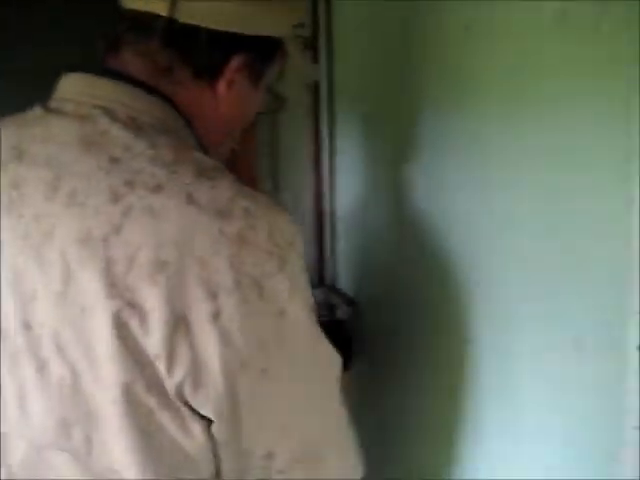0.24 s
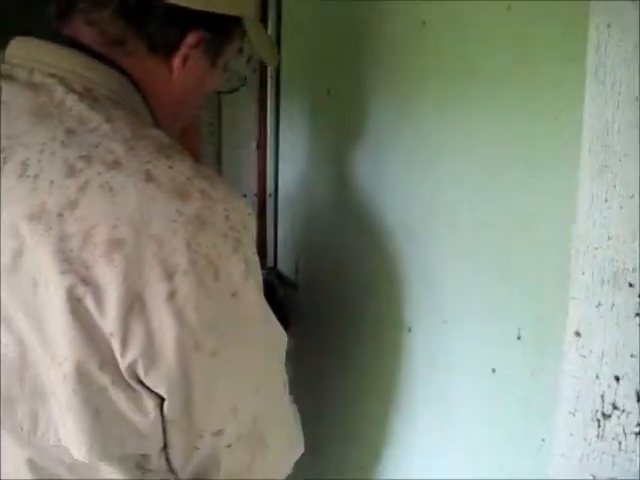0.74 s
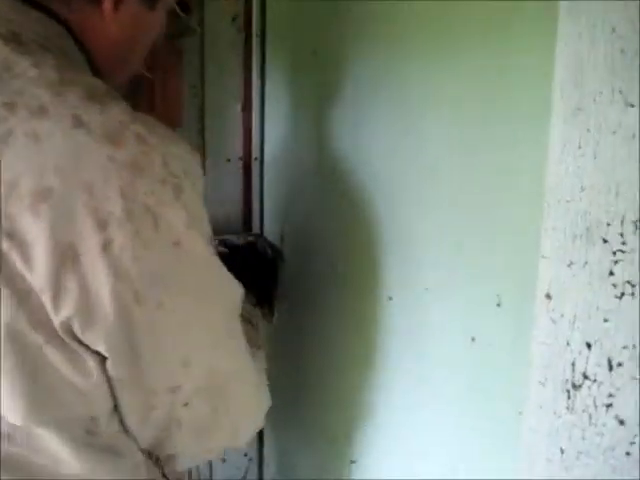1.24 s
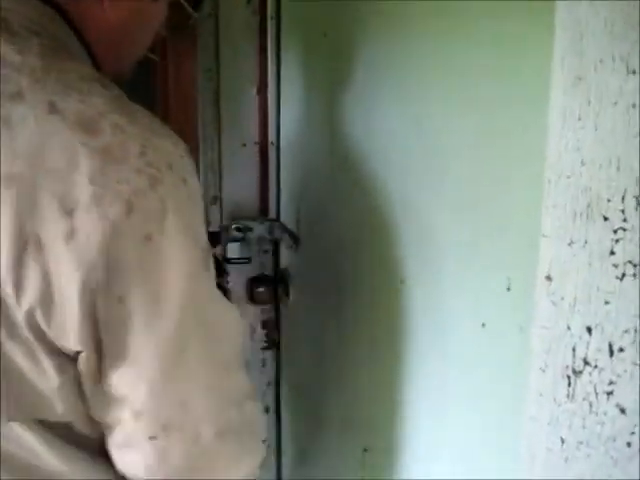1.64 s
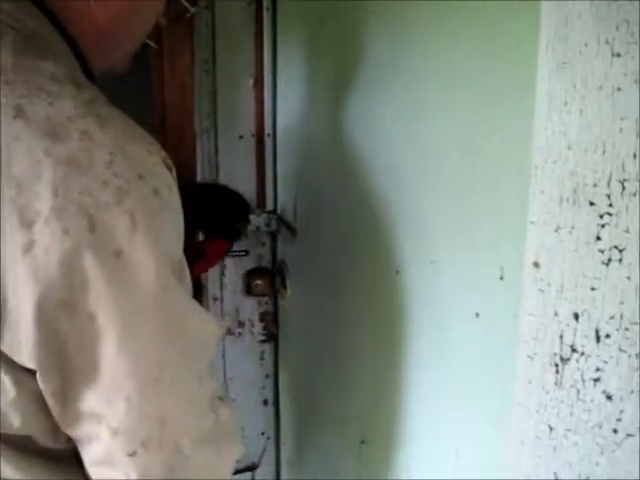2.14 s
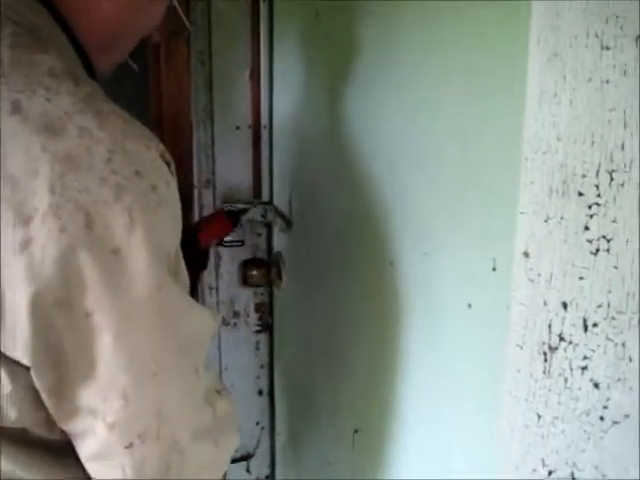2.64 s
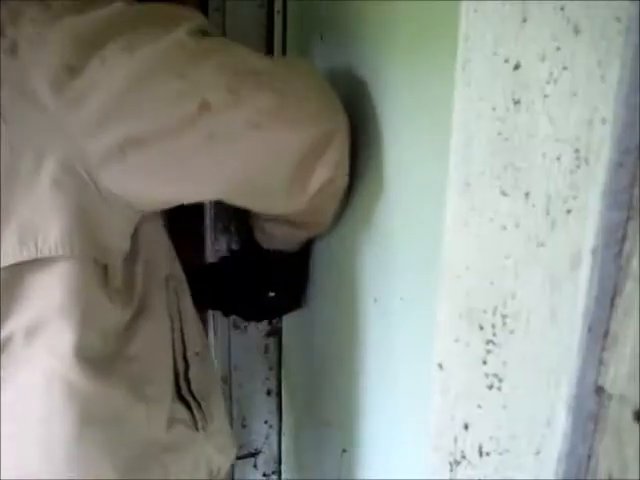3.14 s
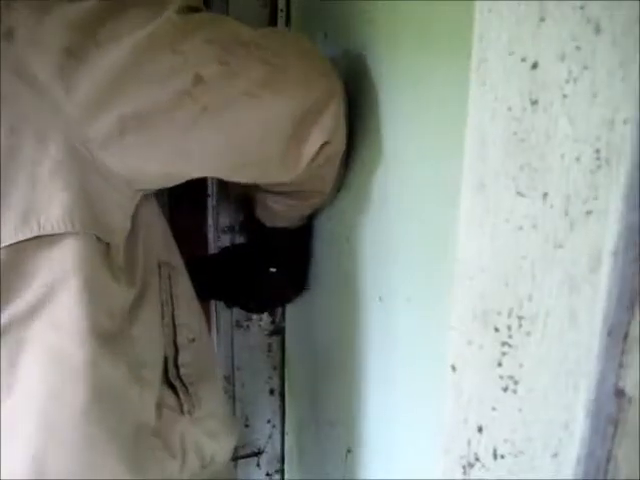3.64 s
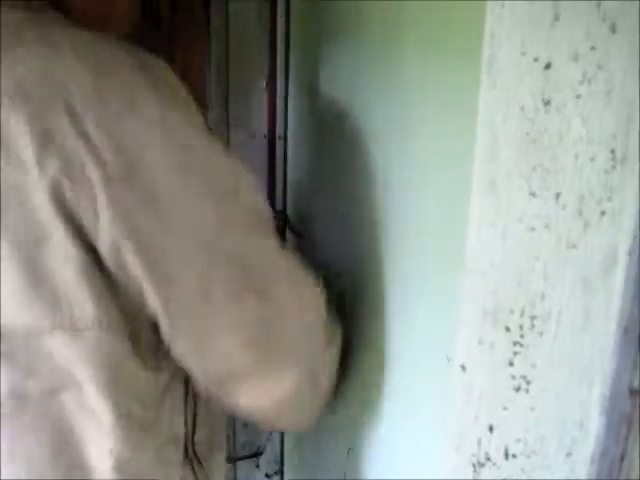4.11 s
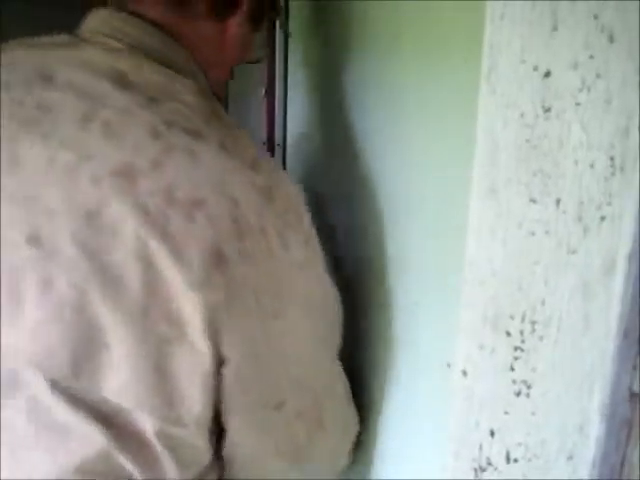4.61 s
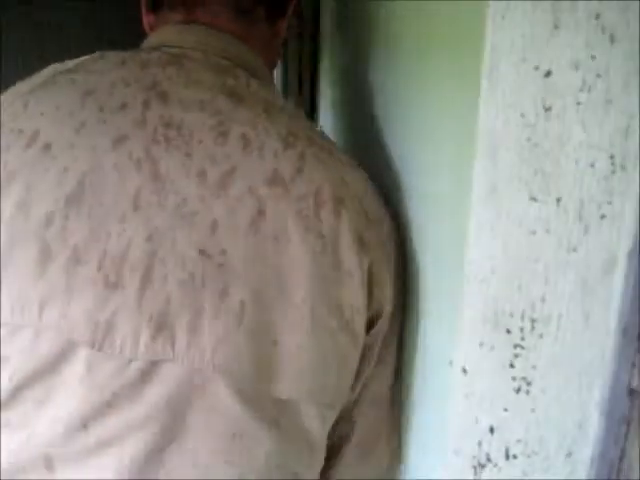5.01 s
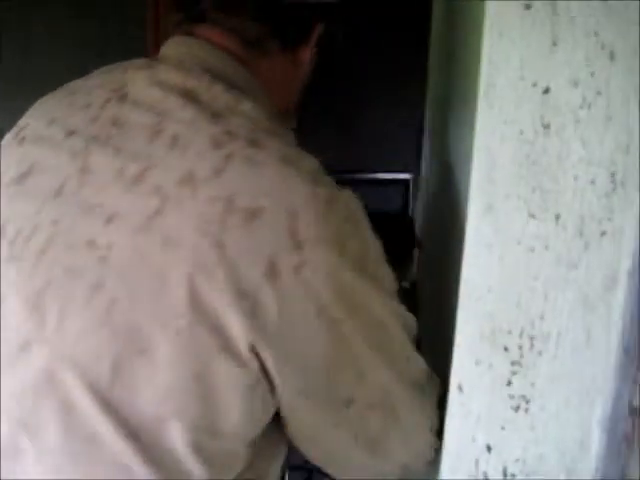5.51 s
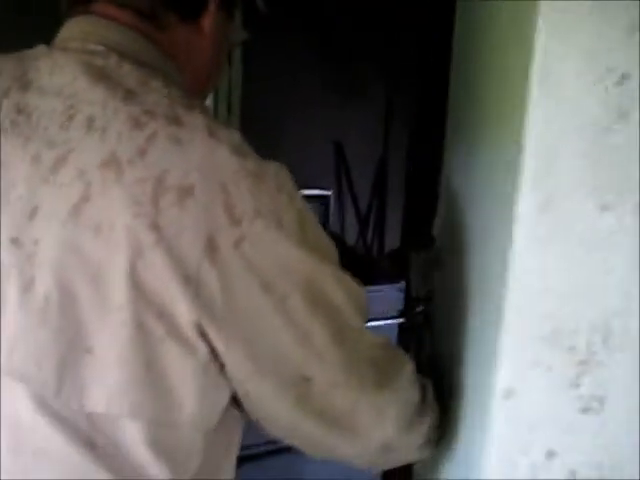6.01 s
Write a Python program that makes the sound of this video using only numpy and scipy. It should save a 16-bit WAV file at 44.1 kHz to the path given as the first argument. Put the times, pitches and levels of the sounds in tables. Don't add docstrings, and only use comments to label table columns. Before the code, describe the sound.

On a porch in steady rain, drips splat close by while hands knock and jiggle a metal lock. A tiny gap in the sound marks a change of moment; rain continues, with a dull door bump. One hard lock click precedes a heavy shove that makes the old door judder, crack and bang loose, its latch clattering. It scrapes and thuds as it swings, with rain still falling. Near, rough handheld microphone, slight wind rumble, faint far engine hum.

```python
import sys
import numpy as np
from scipy import signal
from scipy.fft import rfft, irfft
from scipy.io import wavfile
from scipy.ndimage import uniform_filter1d

SR = 44100
rng = np.random.default_rng(int(sys.argv[2]) if len(sys.argv) > 2 else 0)


def log_audio(samples):
    frames = np.atleast_2d(samples).T
    limited = np.clip(frames, -1, 1)
    pcm = np.round(limited * 32767).astype(np.int16)
    wavfile.write(sys.argv[1], SR, pcm)


def gain_from_decibels(decibels):
    exponent = np.asarray(decibels, float) / 20
    return 10 ** exponent


N = 275743

# [f/Hz, density/dB per Hz]
RAIN_SPECTRUM = [(65, -47), (110, -9.5), (181, -10.5), (258, -6), (568, -5), (792, -1), (1250, 0.5),
                 (1390, -1), (2700, -1), (3610, -1), (5470, -2.5), (8300, -10.5), (13900, -19),
                 (15800, -27)]
# [t/s, level/dB]
RAIN_LEVEL = [(0.0, -29.5), (0.64, -30), (1.01, -29.5), (2.94, -31), (3.1, -30), (3.74, -28.5),
              (4.16, -29.5), (4.47, -28.5), (4.89, -29.5), (5.0, -27.5), (5.38, -29), (5.73, -28),
              (6.25, -29)]
DROPS_PER_S, DROPS_DB = 700, -7.5

AIR_DB, LULL_DB, LULL_START_S, LULL_LENGTH_S = -53.5, -5.5, 1.24, 1.8
SWING_S, SWING_DB, SWING_RISE_S, SWING_FADE_DB_PER_S = 4.96, -40, 0.11, 20

# [f/Hz, level/dB]
WHINE = [(15122, -68), (15149, -65), (15734, -77)]

# [t/s, peak level/dB, colour f/Hz, spray against body/dB]
BURSTS = [(.033, -16, 2600, -6), (.195, -14.5, 4270, -3), (0.33, -24, 2860, 4.5), (1.322, -31, 3130, 10.5),
          (1.609, -22, 2730, -8), (1.706, -18, 6020, -3), (1.745, -20, 5700, -0.5), (2.125, -21, 3760, -8),
          (2.349, -25, 4200, 6), (2.413, -20, 7680, 3.5), (2.448, -18, 4270, -6), (2.536, -19.5, 3710, -7),
          (2.882, -23, 3760, -10), (3.029, -17.5, 3060, -3), (3.401, -23.5, 3030, 5),
          (3.574, -14, 3260, -2.5), (3.579, -11, 3480, -2), (4.048, -15.5, 6430, -4),
          (4.121, -14.5, 5140, -3), (4.327, -20, 3760, 2), (4.559, -14.5, 3900, -2), (4.7474, -31, 5030, 4),
          (5.444, -24, 4690, -1), (5.628, -15.5, 2630, -1.5), (5.709, -9.5, 2800, -8),
          (5.796, -15.5, 2510, -8), (5.872, -13, 2870, -13)]
# [t/s, peak level/dB, colour f/Hz]
DRIPS = [(0.358, -13.5, 3520), (.52, -31, 4490), (0.571, -16, 3600), (0.883, -15, 3940), (0.888, -18, 3600),
         (1.016, -13, 3940), (1.168, -14, 3020), (1.175, -13, 4300), (1.426, -13, 3460), (1.753, -13, 4480),
         (1.767, -12.5, 2840), (2.064, -17, 3130), (2.23, -23, 3570), (2.436, -10, 3160), (2.6, -19, 3940),
         (2.73, -17, 4030), (2.807, -16.5, 5300), (3.218, -21, 3500), (3.309, -14, 5440), (3.51, -17, 3220),
         (3.9973, -15.5, 3700), (4.655, -11.5, 4320), (4.6671, -12, 2960), (5.194, -25, 4660),
         (5.675, -11, 4930), (5.937, -14, 2550)]
DRIP_SPRAY_DB, DRIP_S, BURST_S = -44, 0.0058, 0.0048
SPRAY_HZ, FINER_HZ_PER_DB = 7900, 252

# [t/s, peak level/dB, f/Hz, T60/s]
THUDS = [(0.227, -23, 184, 0.077), (0.238, -36, 86.4, 0.24), (0.608, -32, 181, 0.088),
         (0.91, -30, 187, 0.067), (1.107, -25, 331, 0.17), (1.225, -18, 316, 0.088), (1.25, -27, 188, 0.2),
         (1.481, -28.5, 223, 0.11), (3.711, -30.5, 316, 0.23), (3.749, -28, 251, 0.17),
         (3.893, -11, 350, 0.042), (3.895, -17, 230, 0.13), (3.914, -21, 154, 0.078),
         (3.92, -10.5, 316, 0.033), (3.953, -29, 300, .1), (4.857, -17, 71.6, 0.17),
         (4.895, -10, 132, 0.087), (4.909, -12.5, 195, 0.1), (5.171, -19.5, 91, 0.31),
         (5.255, -19.5, 88, 0.23), (5.346, -25, 319, 0.17), (5.364, -10, 106.6, 0.073),
         (5.373, -16.5, 269, 0.13), (5.44, -20, 370, 0.073), (5.472, -21, 316, 0.048),
         (5.63, -28.5, 155, 0.12), (5.702, -20.5, 81, 0.12), (5.703, -12, 243, 0.038),
         (5.72, -25, 172, 0.081), (5.362, -20, 186, 0.092), (5.16, -24, 245, .08), (5.4, -32, 90, .1)]
# [frequency ratio, level/dB]
LEAF_MODES = [(.55, -10.5), (1, 2.5), (1.5, -7), (2.2, -9.5)]
# [start t/s, length/s, level/dB, first f/Hz, last f/Hz]
SQUEAKS = [(.53, .16, -51, 12000, 11500), (.73, .075, -45, 11800, 13700), (.925, .065, -48, 13900, 11800),
           (4.39, .025, -47, 12600, 12200), (4.46, .02, -50, 12100, 12600),
           (4.535, .018, -43, 12800, 11900), (4.612, .016, -47, 12500, 11600),
           (4.67, .02, -47, 12600, 12900)]
# [start t/s, length/s, level/dB]
RATTLES = [(0.575, 0.076, -34.5), (0.879, 0.063, -29), (1.047, 0.03, -33), (1.087, 0.054, -31.5),
           (1.156, 0.064, -25), (1.19, 0.04, -23.5), (1.26, 0.19, -37), (1.683, 0.12, -37.5),
           (4.585, 0.027, -35)]
RATTLE_PEAK, RATTLE_ENDS_DB = 0.4, -11
# [f/Hz, width/Hz, level/dB]
HASP_RESONANCES = [(640, 240, 5.5), (875, 120, 4), (1360, 260, -4), (1600, 830, 6.5)]
# [t/s, peak level/dB, ring f/Hz, snap against ring/dB]
LOCK_KNOCKS = [(.602, -11, 1360, 4), (.611, -9, 1520, -6), (.906, -5, 1606, -20), (1.056, -13.5, 563, 0),
               (1.0765, -13, 864, -2), (1.087, -6.5, 875, -14), (1.167, -15, 1100, -2),
               (1.198, -1, 1406, -15), (1.212, -15, 454, -13), (1.242, -12, 980, -4), (1.347, -13, 1390, 1),
               (1.722, -9, 2150, -13), (1.771, -11, 1320, 0), (4.5804, 0, 1550, -2),
               (5.64, -8.5, 1360, 7.5)]
# [t/s, peak level/dB, ring f/Hz, snap against ring/dB]
LATCH_KNOCKS = [(4.965, -11, 505, -15), (5.006, -6, 944, -13), (5.046, -7.5, 840, -7),
                (5.071, -7.5, 564, 0), (5.113, -0.5, 2060, -13), (5.1389, 6, 1970, -18),
                (5.143, -2.5, 1500, -16), (5.146, -4.5, 640, -10), (5.155, -13, 890, -15),
                (5.256, -27, 470, -14), (5.708, -10, 2010, -1)]
# [frequency ratio, level/dB]
LOCK_MODES = [(.62, -15.5), (1, -4), (1.37, -10), (1.9, -18.5), (2.8, -14)]
LOCK_CYCLES, LOCK_SNAP_HZ = 20, 2510
LATCH_CYCLES, LATCH_SNAP_HZ = 22.6, 3900

# [start t/s, length/s, level/dB, f/Hz, loudest at share of length]
DRONES = [(.72, 0.68, -45.5, 327, 0.45), (.95, .6, -51, 346, .5), (1.3, 0.61, -55, 317, 0.27),
          (2.947, 0.6, -50, 130.4, .05), (3.6, 2.6, -52.5, 136.7, 0.69)]
DRONE_ENDS_DB = -1
# [t/s, peak level/dB, first f/Hz, last f/Hz, T60/s]
SAGS = [(1.211, -21, 640, 260, 0.093), (1.24, -27, 300, 170, 0.11), (3.893, -21, 640, 610, 0.046),
        (3.892, -23, 150, 190, .07), (3.945, -33.5, 140, 135, 0.17), (5.158, -29, 540, 500, 0.11),
        (5.35, -25, 330, 270, .12), (.9045, -13, 1400, 1900, .04), (1.0752, -1, 880, 820, .024),
        (1.199, -2.5, 1450, 1400, 0.017), (4.5812, -7, 2900, 2600, .01), (4.943, -10, 1150, 1000, 0.018),
        (5.0076, -13, 1050, 950, 0.023), (5.1402, -7, 2000, 1800, .012), (5.1405, -11, 4160, 4000, .01),
        (3.3103, -18, 5800, 5700, .012), (5.257, -20, 199, 170, 0.057), (5.376, -15, 190, 180, .06),
        (4.865, -16, 60, 50, .12), (4.916, -12, 200, 190, .05), (4.952, -11, 190, 150, .05),
        (4.9635, -12, 480, 450, .025), (3.227, -17, 2200, 2100, .015), (3.3125, -16, 3600, 3500, .012),
        (1.262, -27, 220, 170, .08), (3.897, -20, 200, 240, .08)]
SAG_S = 0.0244
# [t/s, peak level/dB, f/Hz,
# T60/s]
SNAPS = [(1.063, -11, 2440, 0.013), (1.0694, -16, 566, 0.027), (1.0777, -2, 1810, 0.0089),
         (1.076, -22, 2600, 0.011), (1.081, -9, 2500, 0.011), (1.178, -10, 1500, .012),
         (1.1993, -13, 790, 0.019), (1.2055, -14, 2110, .012), (1.213, -12, 1200, 0.014),
         (4.5818, -10, 3840, .007), (4.581, -14, 2670, .009), (4.5847, -7, 1670, 0.016),
         (4.5925, -9, 3170, .01), (4.5965, -13, 3700, .008), (4.600, -12, 3360, 0.011),
         (4.607, -13, 1650, .012), (4.9745, -9, 4800, .008), (4.977, -11, 2760, .02),
         (4.981, -11, 6000, .006), (4.9855, -6, 2680, 0.014), (4.9858, -12, 8200, .006),
         (4.990, -8, 6200, .008), (5.012, -10, 5500, .006), (5.0195, -22, 1100, 0.01),
         (5.029, -5, 4600, .008), (5.032, -11, 2300, 0.02), (5.039, -9, 2160, 0.024),
         (5.046, -17, 1900, .015), (5.0765, 0, 4480, .01), (5.111, -8, 1000, 0.014),
         (5.1145, -11, 4270, .01), (5.127, -19, 3640, .015), (5.139, -7, 3050, 0.009),
         (5.140, -3.5, 890, .012), (5.1402, -2, 7650, .006), (5.148, -4, 1600, .015), (5.16, -18, 546, .09),
         (2.351, -14, 4350, .012), (2.438, -17, 3020, .015), (3.3104, -14, 4780, 0.0073),
         (3.577, -9, 3000, .01), (4.9262, -8, 5500, .006), (5.0073, -10, 4300, .006),
         (4.849, -19, 1000, 0.018), (5.2565, -16.5, 480, 0.059), (5.0718, -2, 6260, .006),
         (2.3512, -16, 8800, .01), (2.418, -16, 8450, .01), (1.201, -14, 1600, .01)]
# [t/s, peak level/dB, f/Hz, T60/s]
QUIVERS = [(4.935, -23, 198, .1), (4.964, -19, 199, .1), (5.176, -33, 330, 0.14), (5.2, -32, 420, .12),
           (5.21, -31, 252, 0.13), (5.258, -26.5, 181, .12), (5.27, -32, 264, 0.11),
           (5.289, -35, 398, 0.11), (5.3, -35, 198, .1), (4.46, -44, 70, 0.16), (1.1, -39, 75, 0.12)]
# [t/s, peak level/dB, f/Hz]
PINGS = [(2.3502, -19, 4280), (2.353, -15, 4180), (2.4142, -20, 5500), (2.4388, -17, 2920),
         (4.9145, -3.5, 5000), (4.9558, -3.5, 5800), (5.0066, -9, 4200), (5.14, -2, 6100),
         (5.141, -10, 4400), (5.642, -11, 3900), (5.714, -18, 5800), (5.887, -15, 2900),
         (4.5816, -16, 2880)]
# [frequency ratio, level/dB]
PIN_MODES = [(1, -2.5), (2.1, -17)]
PING_CYCLES = 48
# [t/s, peak level/dB, f/Hz]
BLOWS = [(4.5818, -7, 2270), (4.5835, -8, 3100), (5.0066, -6, 3800), (5.0722, -10, 4000), (5.114, -8, 2700),
         (5.1408, -7, 2800), (5.1418, -5, 2600), (4.9716, -12, 900), (2.3508, -18, 4300),
         (3.3112, -10, 4500), (2.7345, -20, 4100), (3.2255, -17, 2600), (3.228, -16, 2200),
         (3.6015, -23, 2000)]
# [t/s, peak level/dB, f/Hz]
TICKS = [(2.4364, -12, 3200), (3.3095, -11, 4300), (4.5571, -3, 5200), (4.9248, -6, 5200),
         (4.9431, -16, 7000), (4.9540, -5, 5000), (4.9703, -9, 4200), (5.0054, -9, 3500),
         (5.0113, -12, 6000), (5.0267, -6, 4800), (5.0703, -3, 4800), (5.1001, -10, 5000),
         (5.1385, -1, 4500), (5.6256, -13, 5200)]
# [start t/s, length/s, level/dB, centre f/Hz, width/Hz]
BRUSHES = [
    (3.695, .215, -42, 12500, 1800),
    (4.742, .014, -37, 13500, 3000),
    (5.297, 0.071, -23, 4660, 3020),
    (5.332, 0.056, -20, 5200, 6540),
]
BRUSH_PEAK, BRUSH_ENDS_DB = 0.51, -10.5

# [t/s, force on the leaf/dB, slipping of the edge/dB]
SHOVE = [(4.82, -38, -48), (4.875, -17.5, -23), (4.91, -19, -23), (4.965, -13, -20), (5.002, -20.5, -27),
         (5.095, -31, -31.5), (5.12, -20, -29), (5.15, -33, -18), (5.2, -28, -65)]
# [f/Hz, width/Hz, level/dB]
PUSH_RESONANCES = [(35, 30, -12), (64, 34, -8)]
# [f/Hz, width/Hz, level/dB]
RUMBLE_RESONANCES = [(195, 280, 17), (300, 250, 0.95)]
# [f/Hz, width/Hz, level/dB]
GROAN_RESONANCES = [(420, 60, 5.5), (514, 82, 6.5), (670, 89, 1.5), (890, 480, 11), (1370, 400, -22)]
# [f/Hz, density/dB per Hz]
RASP_SPECTRUM = [(880, -9), (1500, 16), (1720, 14), (2000, 16), (6140, 9), (12100, -7), (15800, -35)]
SLIPS_PER_S, FULL_FORCE_DB = 1500, -11
PUSH_DB, PUSH_STEEP, RUMBLE_DB, RUMBLE_STEEP = -13, 1.6, -16, 1.44
PUSH_TIRES_DB_PER_S = 43
# [t/s, peak level/dB, colour f/Hz, length/s, splinter top/dB]
CRACKS = [(4.877, -17, 2570, 0.007, -14), (4.913, -18, 4900, 0.0025, -30), (4.9216, -7, 4400, .0045, -22),
          (4.954, -9, 5600, .002, -16), (4.977, -5, 4360, 0.0034, -18), (4.982, -8, 3580, .003, -1),
          (5.004, -7, 4100, 0.0026, -35), (5.023, -18.5, 3700, 0.037, 2), (5.038, -16, 5000, 0.004, -20),
          (5.0696, 0, 4760, 0.0056, -19), (5.101, -9, 3950, .005, -20), (5.111, -5, 4200, 0.0062, -7),
          (5.138, -1.5, 3620, 0.003, -8)]
CRACK_TOP_HZ = 7700

# [t/s, level/dB]
DROPOUT = [(2.938, 0), (2.9445, -7), (2.9447, -40), (2.9463, -40), (2.9465, 0)]
ONSET_DELAY_S = 0.0015
EDGE_HZ = 15850


def evened(x):
    return x / np.sqrt(np.mean(x ** 2) + 1e-20)


def read(points, hz):
    f, value = np.transpose(points)
    return np.interp(np.log(hz + 1), np.log(f + 1), value)


def add(mix, s, sound):
    part = mix[round(s * SR):][:len(sound)]
    part += sound[:len(part)]


def play(mix, source, events, delay_s=0):
    for s, *settings in events:
        add(mix, s + delay_s, source(*settings))


def span(rows):
    s, *columns = np.transpose(rows)
    t = np.arange(s[0], s[-1], 1 / SR)
    return s[0], [np.interp(t, s, c) for c in columns]


def arch(length, peak, ends_db):
    u = np.arange(0, length, 1 / SR) / length
    distance = np.where(u < peak, 1 - u / peak, (u - peak) / (1 - peak))
    return ends_db * distance ** 2


def resonate(x, hz, width):
    turn = np.exp(2j * np.pi * np.cumsum(hz * np.ones(len(x))) / SR)
    r = np.exp(-np.pi * width / SR)
    return 2 * (turn * signal.lfilter([1 - r], [1, -r], x / turn + 1e-18)).real


def resonate_twice(x, hz, width, second_width):
    return resonate(resonate(x, hz, width), hz, second_width)


def body(x, peaks):
    return evened(sum(gain_from_decibels(db) * evened(resonate_twice(x, hz, w, w)) for hz, w, db in peaks))


def coloured(x, spectrum):
    gain = gain_from_decibels(read(spectrum, np.fft.rfftfreq(len(x), 1 / SR)))
    return evened(irfft(rfft(x) * gain, len(x)))


def grit(size, per_s, spread_db):
    big = gain_from_decibels(spread_db * np.minimum(rng.exponential(1, size), 4.3))
    return big * rng.choice([-1., 1.], size) * (rng.random(size) < per_s / SR)


def ring(hz, t60, partials, rise_s, spread, size=3000):
    t = np.arange(size) / SR
    off = 1 + spread * rng.uniform(-0.8, 1, len(partials))
    modes = np.zeros(size)
    for (k, db), o in zip(partials, off):
        mode_hz = hz * (k * o if k != 1 else 1)
        modes += gain_from_decibels(db - 60 * t * np.sqrt(k) / t60) * np.sin(2 * np.pi * mode_hz * t)
    return modes * (1 - np.exp(-t / rise_s)) ** 2


def rain():
    frames, hz = N // 64 + 5, np.fft.rfftfreq(256, 1 / SR)
    wash = coloured(rng.standard_normal(frames * 64), RAIN_SPECTRUM)
    z = signal.stft(wash, nperseg=256, noverlap=192)[2]
    patches = uniform_filter1d(rng.standard_normal(z.shape), 8, 0)
    patches = evened(uniform_filter1d(patches, 30, 1))
    flicker = evened(uniform_filter1d(rng.standard_normal(z.shape[1]), 12))
    change_db = 1.04 * patches + 0.84 * flicker * (hz[:, None] > 600)
    wash = signal.istft(z * gain_from_decibels(change_db), nperseg=256, noverlap=192)[1][:N]
    t, drops = np.arange(600) / SR, np.zeros(N)
    for hz, t60 in zip(np.geomspace(900, 10000, num=16), rng.uniform(0.011, 0.034, size=16)):
        fizz = resonate_twice(rng.standard_normal(len(t)), hz, .4 * hz, .6 * hz)
        fizz = fizz * gain_from_decibels(-60 * t / t60) * np.minimum(t / 0.0011, 1)
        fizz = evened(fizz) * gain_from_decibels(read(RAIN_SPECTRUM, hz)) * np.sqrt(hz)
        drops += signal.oaconvolve(grit(N, DROPS_PER_S / 16, 3.65), fizz)[:N]
    level_db = np.interp(np.arange(N) / SR, *np.transpose(RAIN_LEVEL)) + 0.16
    return gain_from_decibels(level_db) * (evened(wash) + gain_from_decibels(DROPS_DB) * evened(drops))


def gust():
    air = coloured(rng.standard_normal(N), [(20, -20), (50, -1), (70, 4), (110, -8.0), (200, -48)])
    t = np.arange(N) / SR
    lull = np.sin(np.pi * np.clip((t - LULL_START_S) / LULL_LENGTH_S, 0, 1))
    fade_db = SWING_FADE_DB_PER_S * (t - SWING_S)
    rise_db = 20 * (SWING_S - t) / SWING_RISE_S
    swing_db = SWING_DB - np.maximum(fade_db, rise_db)
    return np.hypot(gain_from_decibels(AIR_DB + LULL_DB * lull), gain_from_decibels(swing_db)) * gain_from_decibels(-3.0) * air


def whine():
    t = np.arange(N) / SR
    return sum(gain_from_decibels(db) * np.sqrt(2) * np.sin(2 * np.pi * hz * t) for hz, db in WHINE)


def splat(db, hz, spray_db, spray_hz, length):
    t = np.arange(3000) / SR
    noise = rng.standard_normal((3, len(t)))
    ragged = gain_from_decibels(1.8 * evened(uniform_filter1d(noise[2], 40)))
    shape = gain_from_decibels(-60 * np.maximum(t - length, 0) / (0.0066 + 9.7 * length)) + gain_from_decibels(-22 - 60 * t / 0.11)
    impact = (1 + .6 * np.exp(-t / .002)) * np.minimum(t / .0003, 1)
    shape = shape * ragged * impact
    core = evened(resonate_twice(noise[0], hz, .35 * hz, .8 * hz))
    broad = evened(resonate(resonate(noise[2], 3800, 4500), 3900, 4900))
    core = (core + gain_from_decibels(0.5) * broad) * shape
    spray = resonate_twice(noise[1], spray_hz, 3800, 5900) * shape
    return gain_from_decibels(db - 2.5) * (core / abs(core).max() + gain_from_decibels(spray_db + 1.5) * spray / abs(spray).max())


def burst(db, hz, spray_db):
    spray_hz = SPRAY_HZ + FINER_HZ_PER_DB * max(spray_db - 3, 0)
    return splat(db, hz, spray_db, spray_hz, BURST_S)


def thud(db, hz, t60):
    return gain_from_decibels(db - 4.0) * ring(hz, t60, LEAF_MODES, 0.17 / hz + 0.0013, 0.18, size=13000)


def drip(db, hz):
    return splat(db, hz, DRIP_SPRAY_DB, SPRAY_HZ, DRIP_S)


def squeak(length, db, first_hz, last_hz):
    level = gain_from_decibels(db + arch(length, .5, -9))
    hz = np.linspace(first_hz, last_hz, len(level))
    line = resonate_twice(rng.standard_normal(len(hz)), hz, 120, 120)
    return level * evened(line) * signal.windows.tukey(len(hz), 200 / len(hz))


def rattle(length, db):
    level = gain_from_decibels(db + arch(length, RATTLE_PEAK, RATTLE_ENDS_DB))
    clicks = grit(len(level), 1500, 2.5)
    return level * body(clicks + 1e-9, HASP_RESONANCES) * signal.windows.tukey(len(level), .2)


def knock(db, hz, t60, snap_db, snap_hz):
    blow = ring(hz, 5 / hz, LOCK_MODES, .06 / hz, .12)
    snapping = ring(snap_hz, .007, LOCK_MODES, .0001, .2)
    sound = ring(hz, t60, LOCK_MODES, 0.45 / hz, 0.19) + gain_from_decibels(-8.0) * blow + gain_from_decibels(snap_db) * snapping
    sound = signal.lfilter(*signal.butter(2, .4 * hz, "high", fs=SR), sound)
    t = np.arange(2500) / SR
    recess = rng.standard_normal(len(t)) * gain_from_decibels(-60 * t / 0.041) * (t > .002)
    echo = signal.oaconvolve(sound, recess / np.linalg.norm(recess))[:len(sound)]
    return gain_from_decibels(db) * (sound + gain_from_decibels(-9) * echo)


def lock_knock(db, hz, snap_db):
    return knock(db, hz, LOCK_CYCLES / hz, snap_db, LOCK_SNAP_HZ)


def drone(length, db, hz, peak):
    db = db + arch(length, peak, DRONE_ENDS_DB)
    pitch, swell = (evened(uniform_filter1d(rng.standard_normal(len(db)), 2500)) for _ in range(2))
    line = hz * (1 + .015 * pitch)
    fuzz = evened(resonate_twice(rng.standard_normal(len(db)), line, 16, 16))
    tone = .75 * np.sin(2 * np.pi * np.cumsum(line) / SR) + .22 * fuzz
    return gain_from_decibels(db + 3 + 1.2 * swell) * tone * signal.windows.tukey(len(db), .05)


def sag(db, first_hz, last_hz, t60):
    t = np.arange(9000) / SR
    hz = last_hz + (first_hz - last_hz) * np.exp(-t / SAG_S)
    tone = np.sin(2 * np.pi * np.cumsum(hz) / SR)
    return gain_from_decibels(db - 60 * t / t60) * tone * (1 - np.exp(-t * first_hz / 0.57))


def snap(db, hz, t60):
    return gain_from_decibels(db) * ring(hz, t60, LOCK_MODES, .0001, 0.18)


def quiver(db, hz, t60):
    return gain_from_decibels(db) * ring(hz, t60, LEAF_MODES, 0.0014, 0.11, size=9000)


def ping(db, hz):
    return gain_from_decibels(db) * ring(hz, PING_CYCLES / hz, PIN_MODES, .0001, 0.037)


def tick(db, hz):
    t = np.arange(300) / SR
    after = gain_from_decibels(-37 - 60 * t / 0.0054) * rng.standard_normal(len(t))
    u = np.pi * hz * np.sqrt(2) * (t - 1 / hz)
    return gain_from_decibels(db + 1.0) * (-2.33 * u * np.exp(-u ** 2) + after)


def brush(length, db, hz, width):
    level = gain_from_decibels(db + arch(length, BRUSH_PEAK, BRUSH_ENDS_DB))
    return level * evened(resonate_twice(rng.standard_normal(len(level)), hz, width, width))


def shove():
    s, (force_db, rasp_db) = span(SHOVE)
    slips = grit(len(rasp_db), SLIPS_PER_S, 2.5)
    hiss = rng.standard_normal(len(slips))
    rasp = coloured(evened(slips) * 0.87 + hiss, RASP_SPECTRUM)
    short_db = force_db - FULL_FORCE_DB
    tired_db = PUSH_TIRES_DB_PER_S * np.arange(len(slips)) / SR
    push = gain_from_decibels(PUSH_DB + PUSH_STEEP * short_db - tired_db) * body(slips, PUSH_RESONANCES)
    rumble = gain_from_decibels(RUMBLE_DB + RUMBLE_STEEP * short_db) * body(slips, RUMBLE_RESONANCES)
    groan = gain_from_decibels(force_db - 5.5) * body(slips, GROAN_RESONANCES)
    return s, push + rumble + groan + gain_from_decibels(rasp_db - 1.0) * rasp


def crack(db, hz, length, top_db):
    return splat(db, hz, top_db, CRACK_TOP_HZ, length)


def latch_knock(db, hz, snap_db):
    return knock(db, hz, LATCH_CYCLES / hz, snap_db, LATCH_SNAP_HZ)


def scene():
    mix = rain() + gust() + whine()
    play(mix, burst, BURSTS, ONSET_DELAY_S)
    play(mix, thud, THUDS)
    play(mix, drip, DRIPS, ONSET_DELAY_S)
    play(mix, squeak, SQUEAKS)
    play(mix, rattle, RATTLES)
    play(mix, lock_knock, LOCK_KNOCKS, ONSET_DELAY_S)
    play(mix, drone, DRONES)
    play(mix, sag, SAGS)
    play(mix, snap, SNAPS)
    play(mix, quiver, QUIVERS)
    play(mix, ping, PINGS)
    play(mix, tick, BLOWS)
    play(mix, tick, TICKS, ONSET_DELAY_S)
    play(mix, brush, BRUSHES)
    add(mix, *shove())
    play(mix, crack, CRACKS, ONSET_DELAY_S)
    play(mix, latch_knock, LATCH_KNOCKS, ONSET_DELAY_S)
    return np.array([mix, mix])


def top_cut(x):
    return signal.sosfilt(signal.butter(12, 15850, fs=SR, output="sos"), x)


def record(dry):
    power_db = 10 * np.log10(abs(uniform_filter1d(dry[0] ** 2, 300)) + 1e-12)
    fall = np.arange(N) * 60. / SR
    held_db = np.maximum.accumulate(power_db + fall) - fall
    over_db = np.maximum(held_db + 14.0, 0)
    ducked = dry / gain_from_decibels(.4 * signal.lfilter([.005], [1, -.995], over_db))
    dropped = ducked * gain_from_decibels(np.interp(np.arange(N) / SR, *np.transpose(DROPOUT)))
    clipped = np.clip(dropped, -.92, .92)
    lowpass = signal.firwin(401, EDGE_HZ, window=("kaiser", 9), fs=SR)
    banded = signal.oaconvolve(clipped, lowpass[None], "same")
    return top_cut(banded)


dry = scene()
out = record(dry)
log_audio(out)
```